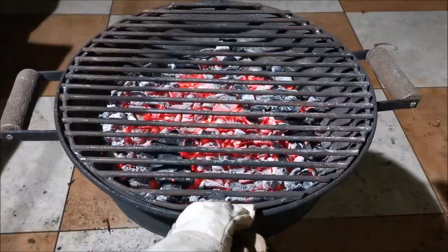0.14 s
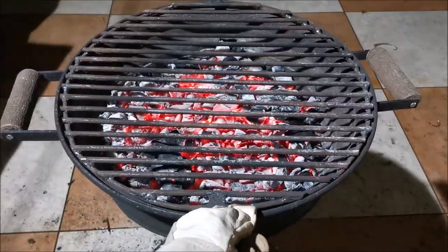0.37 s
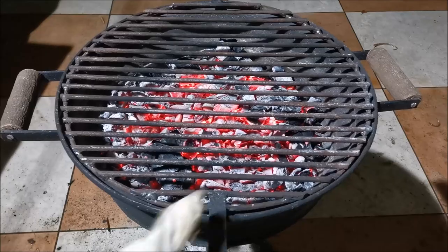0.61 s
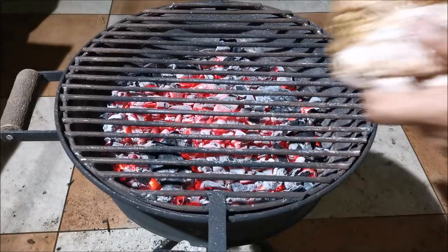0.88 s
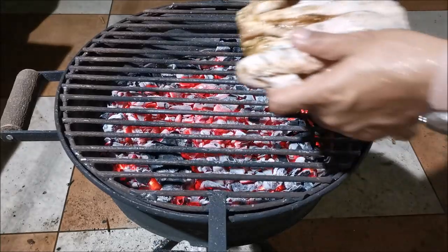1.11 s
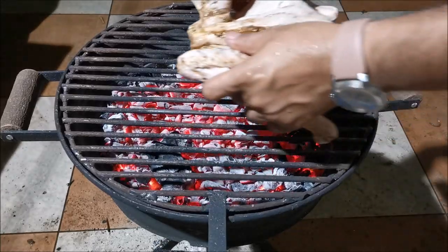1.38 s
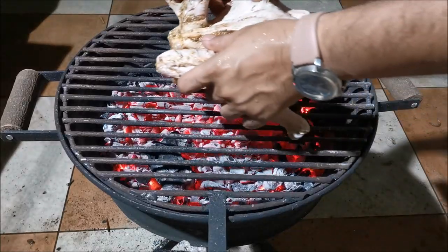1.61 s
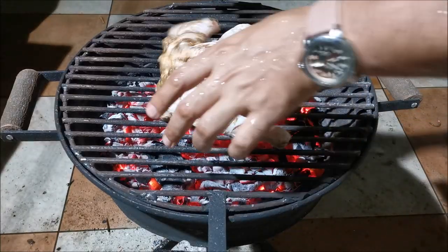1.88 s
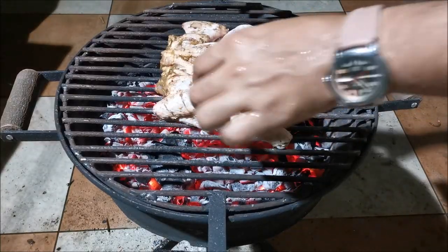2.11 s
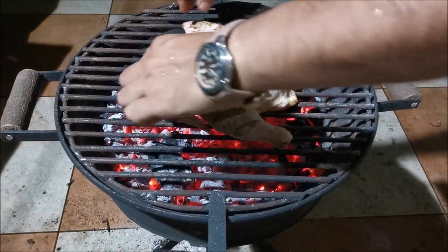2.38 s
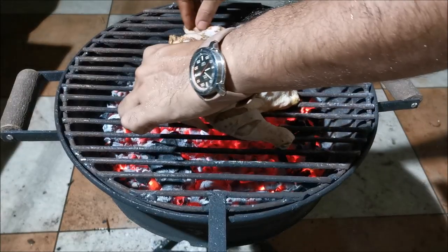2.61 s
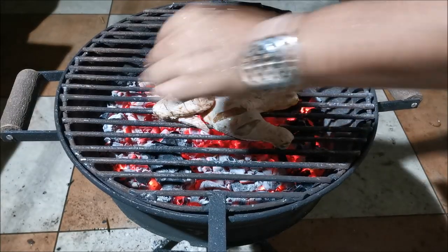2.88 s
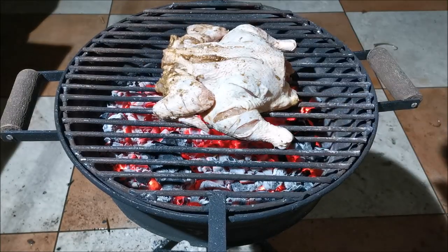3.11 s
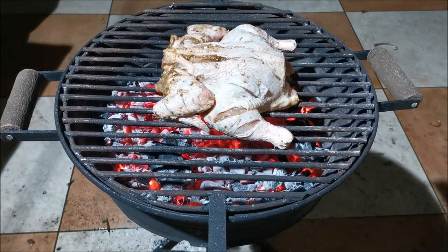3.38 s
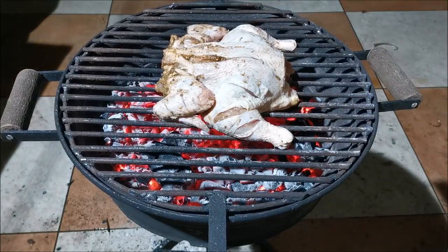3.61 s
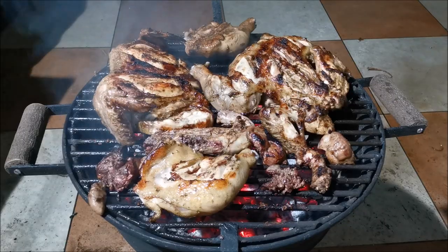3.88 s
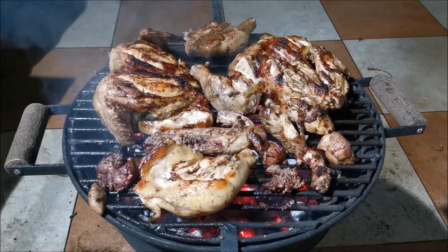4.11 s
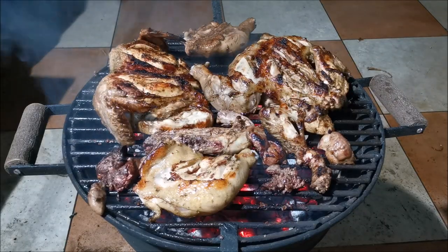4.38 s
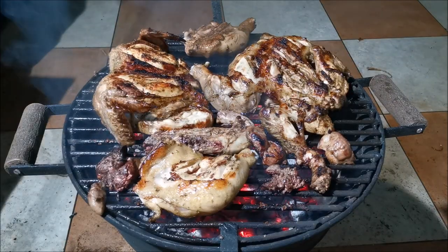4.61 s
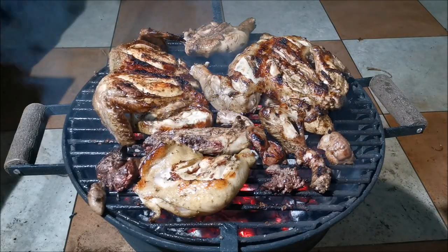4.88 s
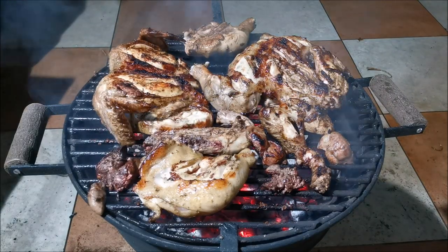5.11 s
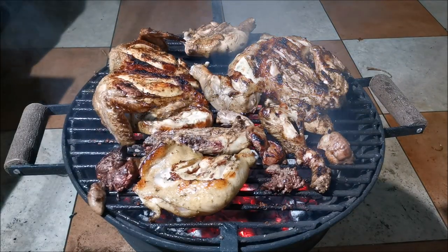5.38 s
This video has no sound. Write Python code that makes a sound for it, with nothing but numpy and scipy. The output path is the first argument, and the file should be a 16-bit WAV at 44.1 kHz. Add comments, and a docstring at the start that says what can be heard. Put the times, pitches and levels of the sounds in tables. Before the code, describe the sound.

Very faint yard air opens. At 0.03 s an iron grate strikes a charcoal grill with a bright clank, knocks again more softly at 0.16 s, and scrapes gratingly, swelling around 0.2-0.3 s; the bars ring briefly and all is gone by about 0.5 s. This part is close, dull and mono. Quiet air remains, with a barely audible low hum from 0.9 s and soft muffled thuds near 0.9, 1.25 and 1.6 s. At about 1.95 s bright, wide stereo sizzling of chicken cuts in: fine fizz, coarse crackle, tiny ringing bubbles and snapping spits of fat, thickest in the first tenth of a second. Low wind buffets the microphone, strongest around 2.85 s, over a faint distant drone. At 3.7 s the sizzle breaks for an instant and the same stretch repeats, with a dull thud and low air rush from 4.07 s, another thud at 4.9 s, fading from 5.1 to 5.5 s.

```python
"""Faint yard air, and almost at once an iron grate is dropped and scraped onto a charcoal grill, in dull mono.
Blows and scraping ticks set the iron bars ringing; hum, thuds and a low rush of air join from the yard.
Then a bright stereo stretch of sizzling meat is played twice: random bursts and hiss make fizz and crackle,
short ringing clicks make the spits of fat, and slow noise makes wind on the microphone. The end fades."""
import sys
import numpy as np
from scipy import signal
from scipy.fft import rfft, irfft
from scipy.io import wavfile
from scipy.ndimage import uniform_filter1d

SR = 44100
rng = np.random.default_rng(int(sys.argv[2]) if len(sys.argv) > 2 else 0)


def int16_out(signal):
    """Quantize to a 16-bit WAV file."""
    q = np.round(np.clip(np.atleast_2d(signal).T, -1, 1) * 32767)
    wavfile.write(sys.argv[1], SR, q.astype(np.int16))


N = 242550   # length [samples], 5.5 s
FRY_S, STOP_S = 1.977, 3.7115   # the frying sets in and breaks off [s]


def undb(db):
    """Turn decibels into a plain factor."""
    return 10 ** (np.asarray(db) / 20)


def seconds():
    """The time of every sample [s]."""
    return np.arange(N) / SR


def rms_one(x):
    """Scale to an average strength (rms) of 1."""
    return x / np.sqrt(np.mean(x ** 2) + 1e-20)


def in_time(rows):
    """Join the points of a table by straight lines, one curve for each column after the time."""
    s, *columns = np.transpose(rows)
    return [np.interp(seconds(), s, column) for column in columns]


def spectrum_hz():
    """The frequency of every bin of the spectrum [Hz]."""
    return np.maximum(np.arange(N // 2 + 1) * SR / N, 1)


def at_hz(points, hz):
    """Read a frequency table between its points, on a logarithmic pitch scale."""
    table = np.array(points)
    return np.interp(np.log(hz), np.log(table[:, 0]), table[:, 1])


def colour(x, spectrum):
    """Give a sound with all pitches alike the tone of a table; rms 1."""
    return rms_one(irfft(rfft(x) * undb(at_hz(spectrum, spectrum_hz())), N))


def noise():
    """Even hiss, rms about 1."""
    return rng.standard_normal(N)


def cut(x, hz, kind="low", order=2):
    """Gentle filter: keep what lies below, above or between the given hz."""
    return signal.sosfilt(signal.butter(order, hz, kind, fs=SR, output="sos"), x)


def wall(x, hz):
    """The steep top edge of a narrow channel."""
    return signal.sosfilt(signal.cheby2(22, 70, hz, fs=SR, output="sos"), x)


def drift(rate):
    """Slow random wandering with rms 1; a higher rate [Hz] wanders faster."""
    r = np.exp(-80 * np.pi * rate / SR)   # computed at every 40th sample only
    chance = rng.standard_normal(N // 40 + 2002)
    slow = signal.lfilter([1], [1, -2 * r, r * r], chance)[2000:]
    return np.interp(np.arange(N) / 40, np.arange(len(slow)), rms_one(slow))


def ring(clicks, hz, t60):
    """A click of 1 starts a sine of height 1 that dies by 60 dB in t60 seconds."""
    r, w = undb(-60 / (max(t60, .001) * SR)), 2 * np.pi * hz / SR
    return signal.lfilter([0, np.sin(w)], [1, -2 * r * np.cos(w), r * r], clicks + 1e-18)


def grains(per_s, spread_db):
    """Random clicks, most small, a few large."""
    sizes = undb(spread_db * np.minimum(rng.exponential(1, N), 5)) * rng.choice([-1, 1], N)
    return sizes * (rng.random(N) < per_s / SR)


# still air of the yard: (time [s], level [dB], extra bass [dB]); level and bass also wander
AIR_LEVEL = [(0, -64.5, 4.5), (0.87, -67.5, 6), (0.89, -62.5, 8), (1.0, -62, 3), (1.9, -63, 5),
             (3.7, -56.5, -6), (4.07, -70.5, 10.5), (5.5, -54, 0.5)]
# tone of that air: (frequency [Hz], relative level [dB])
AIR_TONE = [(18, -51.5), (30, -24), (225, -8), (258, -7.5), (304, -10.5), (383, -5.5), (430, -8),
            (768, -6.5), (1540, -10.5), (1890, -18), (3300, -19), (4570, -23.5), (5700, -13), (6770, -6),
            (7600, -19), (9880, -54.5), (16700, -120)]


def yard_air():
    """Steady hiss stands for still air; its level and bass wander, and it drops out for a moment."""
    level_db, bass_db = in_time(AIR_LEVEL)
    air = colour(noise(), AIR_TONE)
    low = cut(air, 800, order=1) + cut(air, 320)
    level = undb(level_db + 0.18 * drift(5.3))
    more_bass = undb(bass_db * (1 + 0.28 * drift(6.4))) - 1
    t = seconds()
    hush_db = -26 * (t > 3.706) * (t < 4.06)
    return level * (air + more_bass * low) * undb(hush_db)


# grate sliding on the rim: (time [s], rasp level before the jolts [dB])
SLIDE = [(0.027, -57.5), (0.031, -38.5), (0.09, -38.5), (0.11, -42.5), (0.16, -43), (0.22, -34),
         (0.3, -32.5), (0.38, -41), (0.47, -63)]


def slide():
    """The rasp jumps at each blow, and swells again towards 0.3 s: curves of rasp, its edges and ringing in dB."""
    t = seconds()
    since_blow = np.min([np.where(t >= s, t - s, 1) for s, *_ in BLOWS], axis=0)
    # each blow makes the rasp jump by 9 dB, then settle
    rasp_db = in_time(SLIDE)[0] + 9 * np.exp(-since_blow / 0.02)
    # from 0.35 s bass and top of the scrape fall by 330 dB per s for a tenth of a second
    edges_db = -0.5 - 330 * np.clip(t - 0.35, 0, .1)
    # after each blow the grate comes to rest on the rim and rings less freely
    rest_loss_db = 52 * np.minimum(since_blow, .3)
    # from 0.26 s the ringing fades ever faster
    late_loss_db = 598 * np.clip(t - 0.26, 0, .3) ** 2
    return rasp_db, edges_db, 7.0 - rest_loss_db - late_loss_db


# tone of the scrape: (frequency [Hz], relative level [dB])
RASP_TONE = [(59, -48), (100, -33.5), (658, -6), (963, -6), (1070, 3), (1490, -2.5), (2100, 2), (2380, 0),
             (5590, -7), (7600, -36), (9880, -57), (16700, -120)]


def scrape(rasp_db, edges_db):
    """Iron catching on iron: thousands of tiny clicks; in the end only the middle pitches are left."""
    rasp = colour(grains(9000, spread_db=2.0) * undb(1.4 * drift(45)), RASP_TONE)
    middle_band = signal.butter(2, [1400, 5900], "band", fs=SR, output="sos")
    core = signal.sosfiltfilt(middle_band, rasp)
    return undb(rasp_db) * (core + undb(edges_db) * (rasp - core))


# the grate strikes the rim: (time [s], blow strength [dB], bright crack strength [dB])
BLOWS = [(0.029, -14.5, -16), (0.163, -19, -20)]


def blow_clicks(column, change_db=0):
    """One click per blow, as strong as the chosen column says."""
    clicks = np.zeros(N)
    at = [round(row[0] * SR) for row in BLOWS]
    clicks[at] = undb(np.array(BLOWS)[:, column] + change_db)
    return clicks


# bars of the grate: (frequency [Hz], relative level [dB], time to die by 60 dB before further fading [s])
BARS = [(498, -22, 0.53), (749, -17.5, 0.16), (1057, -24, 0.39), (1088, -20.5, 0.77), (1310, -18, 0.33),
        (1637, -19.5, 0.27), (1696, -15, .3), (1757, -4, 0.12), (1858, -28, 0.3), (2030, -3.5, 0.41),
        (2140, -4.5, 0.58), (2170, -12, 0.3), (2534, -16, 0.35), (2630, -17, 0.35), (2750, -11, .5),
        (3100, -22, .4), (3220, -22, 0.5), (3505, -17, 0.39), (4200, -12, .12), (4300, -28, 0.067),
        (4770, -12, 0.16), (5510, -10, 0.08), (5625, -4.5, 0.097), (5970, -17.5, 0.19), (6260, -19, 0.17),
        (7140, -20.5, 0.32), (7240, -18, 0.13)]


def bars(rasp_db):
    """Blows and the dense ticks of the slide set each iron bar ringing at its own pitch."""
    ticks = undb(rasp_db) * rms_one(grains(2500, spread_db=2.0))
    total = 0
    for hz, level_db, t60 in BARS:
        chance_db = rng.normal(0, 1.3, len(BLOWS))   # each blow hits each bar a little differently
        push = undb(-31.0) * ticks + blow_clicks(1, chance_db - 23.5)
        total = total + undb(level_db) * ring(push, hz, t60)
    return total


# the rim's short knock: (frequency [Hz], relative level [dB], time to die by 60 dB [s])
RIM = [(773, -41, 0.017), (1880, -22, 0.012)]


def rim_knock():
    """The rim gives for a millisecond, so its knock swells before it dies."""
    blows = blow_clicks(1)
    return sum(undb(db) * ring(ring(blows, hz, 0.0073), hz, t60) for hz, db, t60 in RIM)


def crack():
    """The hard contact: a bright burst of hiss that dies by 60 dB in 0.052 s."""
    dying = signal.lfilter([1], [1, -undb(-60 / (0.052 * SR))], blow_clicks(2))
    return dying * cut(noise(), [3900, 6600], "band")


def grate():
    """Iron on iron: ringing bars, the knock of the rim, bright cracks and the scrape."""
    rasp_db, edges_db, ring_db = slide()
    return undb(ring_db) * bars(rasp_db) + rim_knock() + crack() + scrape(rasp_db, edges_db)


# soft thuds: (time [s], strength before softening [dB], frequency [Hz], time to die by 60 dB [s])
THUDS = [(0.029, -41.5, 199, 0.2), (0.117, -44, 183.7, 0.32), (0.166, -61, 198, .1),
         (0.921, -56.5, 203, 0.13), (1.249, -54.5, 149, 0.2), (1.565, -52.5, 400, .06),
         (4.069, -39, 476.7, 0.043), (4.92, -42, 193, .2)]


def thuds():
    """A soft contact starts gently: a low ringing click with its sharp start filtered off."""
    out = np.zeros(N)
    for s, db, hz, t60 in THUDS:
        click = np.zeros(N)
        click[round(s * SR)] = undb(db)
        out += cut(cut(ring(click, hz, t60), 2.173 * hz), 70, "high")
    return out


def hum():
    """A steady low sine of 48.4 Hz at -70 dB rms that sets in and stops."""
    t = seconds()
    return (t > 0.875) * (t < 3.7) * np.sqrt(2) * undb(-70) * np.sin(2 * np.pi * 48.4 * t)


# how alike left and right are: (frequency [Hz], likeness from -1 opposite to 1 the same)
LIKENESS = [(60, -0.49), (99, -0.99), (160, 0.8), (270, 0.73), (440, 0.89), (730, 0.91), (1200, 0.87),
            (1970, 0.91), (3240, 0.919), (5340, 0.55), (8790, 0.758), (14500, 0.87)]


def widen(mid, side):
    """Left and right share the mid and differ by the side, band by band."""
    alike = np.clip(at_hz(LIKENESS, spectrum_hz()), -1, 1)
    shared = irfft(rfft(mid) * np.sqrt(1 + alike), N)
    differing = irfft(rfft(side) * np.sqrt(1 - alike), N)
    return np.array([shared + differing, shared - differing]) / np.sqrt(2)


def boil(spectrum, per_s, spread_db, hiss_db):
    """Bursting bubbles over steam hiss: bursts come from the middle, the sides differ mostly by hiss."""
    burst = rms_one(grains(per_s * undb(2.5 * drift(60)), spread_db))
    mid = colour(burst + undb(hiss_db) * noise(), spectrum)
    side = colour((undb(hiss_db + 11.0) + np.abs(burst)) * noise(), spectrum)
    pair = widen(mid, side)
    # the heat, not chance, sets the slow level
    return pair / np.sqrt(uniform_filter1d(np.mean(pair ** 2, axis=0), size=1800))


def bubbles(per_s, cycles, low_hz, high_hz):
    """Larger bubbles come in clumps and ring, each at one of fourteen pitches and a place of its own."""
    born = grains(per_s * undb(3.2 * drift(24)), spread_db=3.0)
    dealt, place = rng.integers(0, 14, N), rng.normal(0, 0.099, N)
    both = np.array([born * (1 + place), born * (1 - place)])
    out = 0
    for k, hz in enumerate(np.geomspace(low_hz, high_hz, 14)):
        out = out + ring(ring(both * (dealt == k), hz, 0.0021), hz, cycles / hz)
    return rms_one(out)


# vigour of the boil: (time [s], fine fizz level [dB], coarse crackle level [dB]), before the flares
HEAT = [(1.98, -42, -50), (2.0, -34, -45), (2.08, -35, -44.5), (2.14, -35, -42.5), (2.305, -38, -45),
        (2.38, -37, -43), (2.5, -37, -44), (2.57, -35.5, -42.5), (2.65, -36, -45.5), (2.69, -38, -43.5),
        (2.92, -35.5, -45.5), (3.05, -36, -44), (3.1, -35, -43), (3.32, -34, -44.5), (3.47, -36, -44.5),
        (3.6, -36, -46), (3.69, -37.5, -47), (3.71, -41, -49)]
# the fizz flares up briefly: (time [s], level above the boil [dB], dying time [s])
FLARES = [(1.998, 3, 0.016), (2.066, 3.5, 0.0096), (2.314, 5, 0.085), (2.972, 4, 0.035),
          (3.628, 4.5, 0.0055)]


def vigour():
    """Hotter fat bursts more loudly: levels of fizz and crackle in dB, the heat plus its flares."""
    t = seconds()
    flares_db = 0
    for s, db, dying_s in FLARES:
        pace_s = np.where(t < s, 0.015, max(dying_s, .002))   # rising, then dying
        flares_db = flares_db + db * np.exp(-np.abs(t - s) / pace_s)
    fizz_db, crackle_db = in_time(HEAT)
    return fizz_db + flares_db, crackle_db + 0.55 * flares_db


# tone of the fine fizz: (frequency [Hz], relative level [dB])
FIZZ_TONE = [(3000, -15), (5000, -11.5), (6600, -4), (7800, 1), (9500, 2.5), (10500, 4.5), (11500, 1.5),
             (13000, 1.5), (14500, -6)]
# tone of the coarse crackle: (frequency [Hz], relative level [dB])
CRACKLE_TONE = [(500, -10.5), (750, -16), (980, -3.5), (1300, -8), (1800, -7), (2300, -1.5), (2750, -3),
                (3200, -1.5), (3750, -4.5), (4300, 0), (5100, -0.5), (6500, -3), (9000, -31)]


def meat():
    """Frying: fine fizz, coarse crackle and ringing bubbles, quieter before and after the frying."""
    t = seconds()
    fizz_db, crackle_db = vigour()
    fizz = undb(fizz_db) * boil(FIZZ_TONE, 5000, spread_db=3.0, hiss_db=-1.0)
    crackle = undb(crackle_db) * boil(CRACKLE_TONE, 1200, spread_db=3.5, hiss_db=8.0)
    ringing = undb(crackle_db - 7.0) * bubbles(500, cycles=72.0, low_hz=2098, high_hz=3417)
    quiet_db = -15.5 * (t < FRY_S) - 30 * (t > STOP_S)
    return undb(quiet_db) * (fizz + crackle + ringing)


# gusts on the microphone ports: (time [s], left level [dB], right level [dB])
WIND = [(1.93, -54, -48), (1.98, -38.5, -39.5), (2.15, -36.5, -41), (2.3, -44.5, -49), (2.62, -35.5, -50),
        (2.76, -40, -42.5), (2.85, -46, -31), (2.95, -32.5, -46), (3.25, -36, -50), (3.58, -47, -52),
        (3.68, -35.5, -50), (3.72, -48, -50)]
# tone of the wind at each port: (frequency [Hz], relative level [dB])
LEFT_PORT = [(3, -22), (9, -2), (14, -3), (18, -7), (35, -14), (60, -26), (100, -40), (200, -62)]
RIGHT_PORT = [(3, -12), (12, -4), (20, 0), (30, -4), (50, -13), (100, -29), (200, -50)]
# one buffet: (time [s], left level [dB], right level [dB], width [s], sway [Hz])
BUFFET = (2.845, -16.5, -36, .07, 11.0)
# quick thump in it: (time [s], left strength [dB], right strength [dB], frequency [Hz], 60 dB decay [s])
SLAP = (2.827, -38, -29, 60.0, .07)


def wind():
    """Slow pressure lumps, of their own at each port; one buffet rocks both."""
    lumps = np.array([colour(noise(), port) for port in (LEFT_PORT, RIGHT_PORT)])
    # evened so that the gusts lead
    lumps = lumps / np.sqrt(uniform_filter1d(lumps ** 2, size=6000) + 1e-12)
    s, left_db, right_db, width_s, sway_hz = BUFFET
    t = seconds() - s
    dent = np.exp(-np.abs(t) / width_s) * np.cos(2 * np.pi * sway_hz * t)
    dent = dent * undb([[left_db], [right_db]])
    s, left_db, right_db, hz, t60 = SLAP
    click = 1. * (np.arange(N) == round(s * SR))
    slap = cut(ring(click, hz, t60), 200) * undb([[left_db], [right_db]])
    return lumps * undb(in_time(WIND)) - dent + slap


# far machine: (frequency [Hz], level before wavering [dB rms])
DRONE = [(118.4, -68), (253, -68.5), (398, -74)]
# tone of the far rumble: (frequency [Hz], relative level [dB])
RUMBLE_TONE = [(50, -20), (90, -5), (250, 1), (480, -15.5), (580, -2), (1500, -22.5)]


def drone():
    """Wavering low tones of a far machine and a wide rumble, quieter once the frying breaks off."""
    t = seconds()
    tones = 0
    for hz, db in DRONE:
        level = np.sqrt(2) * undb(db + 2.7 * drift(4.1))
        tones = tones + level * np.sin(2 * np.pi * hz * t + 1.14 * drift(4.9))
    rumble = undb(-61) * widen(colour(noise(), RUMBLE_TONE), colour(noise(), RUMBLE_TONE))
    return undb(-30 * (t > STOP_S)) * (tones + rumble)


# the loudest spits of fat:
# (time [s], snap level [dB], snap frequency [Hz], knock relative to the snap [dB], left over right [dB])
SPITS = [(1.9903, -16, 11800, -24.4, -0.5), (1.9937, -18, 11700, -28, -6), (1.9975, -11, 11500, -31, -0.7),
         (2.0007, -11.5, 10900, -22, -0.1), (2.005, -12, 7200, -18, -2.1), (2.0178, -18, 10200, -18.8, 0.9),
         (2.0216, -24, 10600, -8, 0.6), (2.0322, -25, 11200, -11, -0.2), (2.0416, -20.7, 11300, -12.1, 2.0),
         (2.0464, -14, 11400, -31, 0.1), (2.0512, -23, 10900, -26, -0.5), (2.0619, -11, 11300, -24, -0.7),
         (2.0669, -24, 11000, -11.7, -1.9), (2.1416, -20, 12100, -16, -0.5),
         (2.3111, -14.5, 10100, -16, -0.7), (2.322, -22, 10200, -29, -0.4),
         (2.3308, -20.3, 9500, -20.2, -0.3), (2.3644, -15, 10900, -22.0, -0.1),
         (2.4249, -14, 10700, -14, -0.0), (2.4534, -17.9, 9700, -22, -3.2),
         (2.6104, -22, 10100, -21.6, 0.5), (2.6568, -22, 11700, -16.3, -5), (2.9937, -24, 10900, -17, -1.1),
         (2.9971, -14.0, 10900, -28, 0.6), (3.2431, -17, 9300, -19, -0.5),
         (3.3573, -17, 10600, -25.2, -0.0), (3.404, -20.1, 11800, -16.2, -1.4),
         (3.5139, -17.5, 10200, -25.5, 2), (3.5373, -16, 9500, -17, -0.3), (3.5556, -17, 10500, -25.0, 0.2),
         (3.6082, -15, 9000, -28.1, 0.2), (3.6219, -25, 11000, -16.1, 0.5), (3.626, -23, 10900, -20, 1),
         (3.6299, -14, 8800, -18.7, 1.7)]


def spits():
    """Each spit is a bright, very short snap with a duller knock under it; small ones fall at random."""
    small = 45
    when = FRY_S + (STOP_S - FRY_S) * rng.random(small)
    # columns as in the table after the time: the usual value and its random spread
    usual, spread = [-27.5, 10600, -12, 0], [5, 700, 1.5, 5]
    rows = np.r_[SPITS, np.c_[when, usual + rng.standard_normal((small, 4)) * spread]]
    out, chance = np.zeros((2, N)), rng.random((len(rows), 2))
    for (s, db, hz, knock_db, pan_db), (pitch, sign) in zip(rows, chance):
        click = np.zeros(400)
        click[0] = np.sign(sign - .5)
        snap = cut(ring(click, hz, .0008), 0.4 * hz, "high")
        knock = ring(click, 2200 + 1500 * pitch, 0.0023)
        spit = snap / np.abs(snap).max() + undb(knock_db) * knock
        at = round(s * SR)
        out[:, at:at + 400] += spit * undb([[db + pan_db / 2], [db - pan_db / 2]])
    return out


def sizzling_stretch():
    """Meat, spits, wind and drone are made once, then played again right after themselves."""
    start_s, repeat_s = 1.925, 1.80159
    t = seconds()
    once = meat() + spits() + wind() + drone()
    gate = np.clip((t - start_s) / 0.0026, 0, 1) * (t < start_s + repeat_s)
    once = wall(once * gate, 14240)
    lag = round(repeat_s * SR)
    return once + np.pad(once, ((0, 0), (lag, 0)))[:, :N]


# low rushes of air: (start [s], level before wavering [dB], hold [s], release [dB per s])
RUSHES = [(1.998, -49.5, .02, 92), (4.07, -48.5, .68, 55)]
# tone of the rushes: (frequency [Hz], relative level [dB])
RUSH_TONE = [(90, -16), (150, -11), (250, -10), (500, -2.5), (800, -5.5), (1150, -13), (1500, -25),
             (2500, -20.5)]


def rushes():
    """Low moving air as coloured hiss: each rush sets in fast, holds and dies away."""
    t, level = seconds(), 0
    for s, db, hold_s, release_db in RUSHES:
        attack_loss_db = 1500 * np.maximum(s - t, 0)
        release_loss_db = release_db * np.maximum(t - s - hold_s, 0)
        level = level + undb(db - attack_loss_db - release_loss_db)
    return level * undb(drift(33)) * colour(noise(), RUSH_TONE)


def scene():
    """The dull mono sounds of grate and yard, with the bright stereo stretch on top."""
    yard = yard_air() + thuds() + hum() + rushes()
    mono = cut(grate(), 110, "high", order=4) + yard
    return wall(mono, 7980) + sizzling_stretch()


def top_cut(x):
    """Nothing passes above the cut-off."""
    return signal.sosfilt(signal.butter(12, 15080, fs=SR, output="sos"), x)


# overall level, falling at the end: (time [s], level [dB])
FADE = [(0, 0.5), (5.08, 0.5), (5.25, -2), (5.5, -7.5)]


def record(dry):
    """The finished mix: the scene with its closing fade."""
    mix = dry * undb(in_time(FADE)[0])
    return top_cut(mix)


dry = scene()
out = record(dry)
int16_out(out)
```